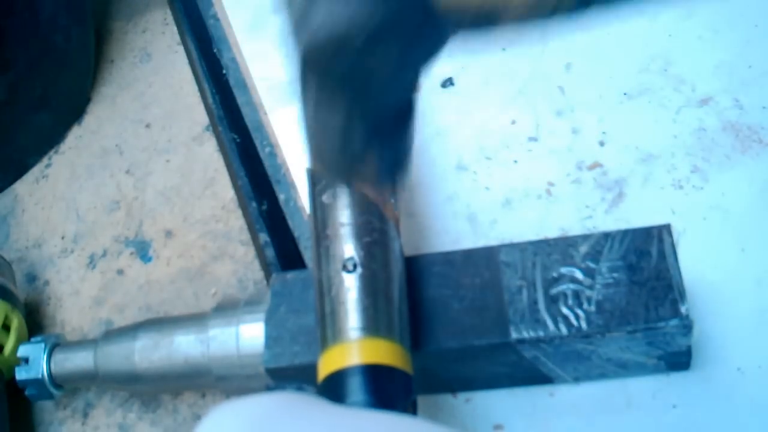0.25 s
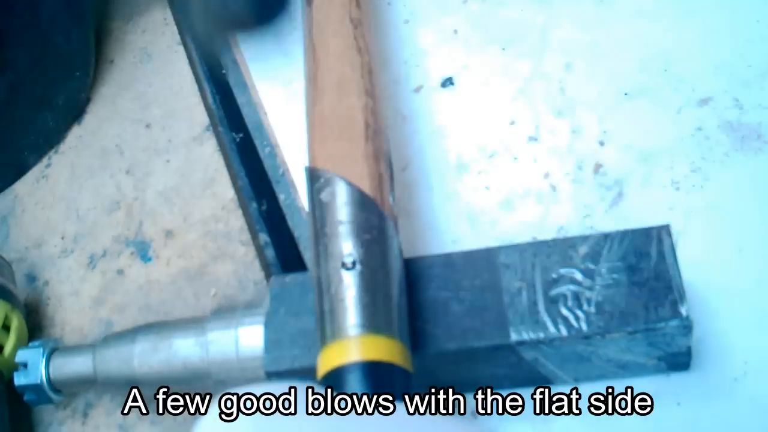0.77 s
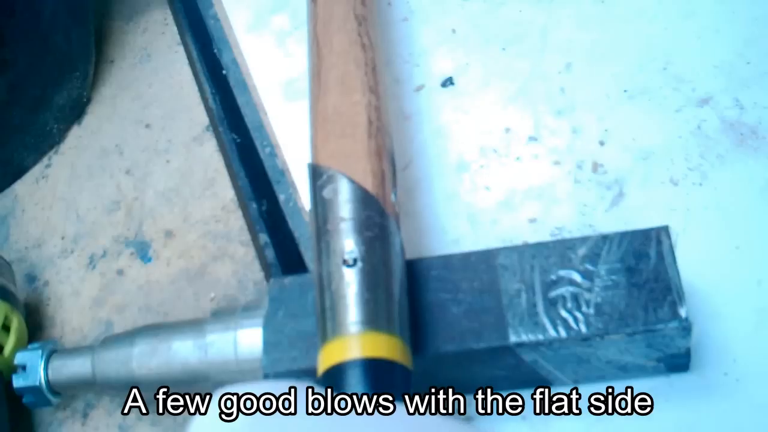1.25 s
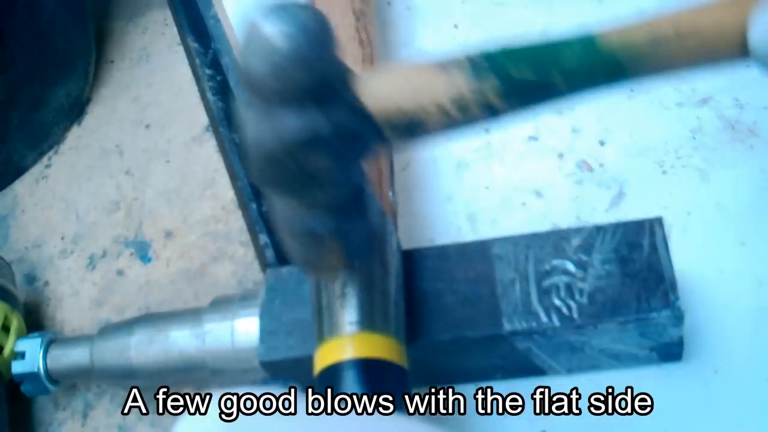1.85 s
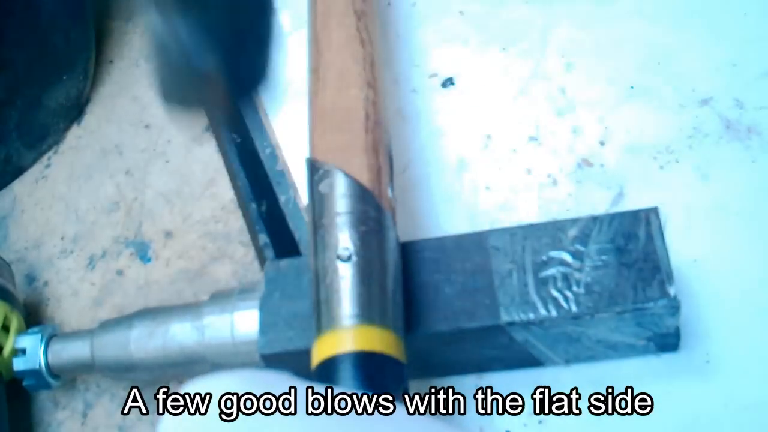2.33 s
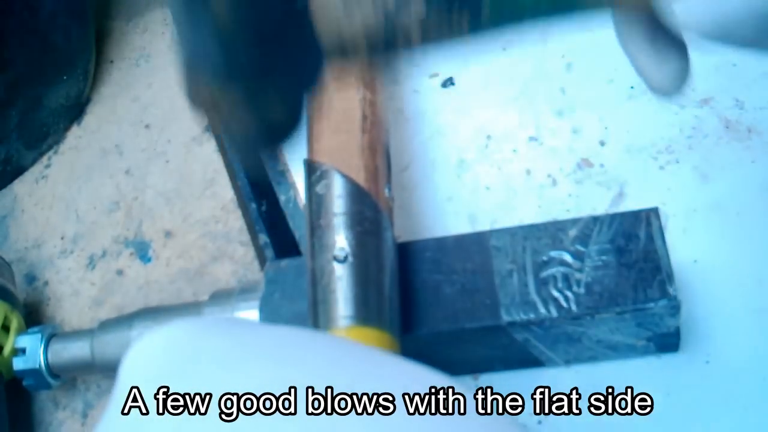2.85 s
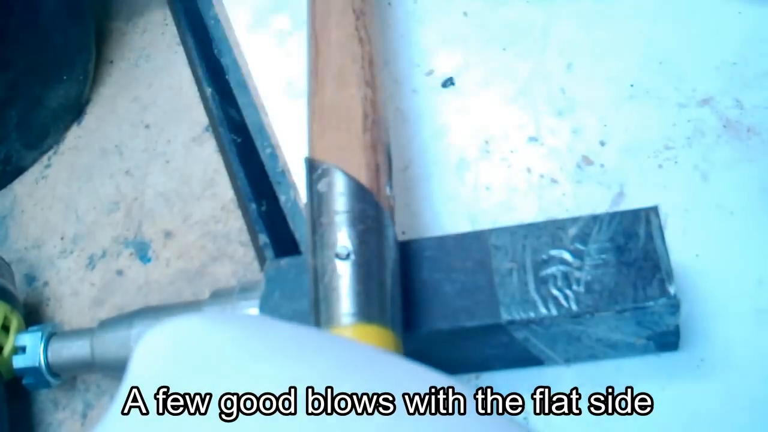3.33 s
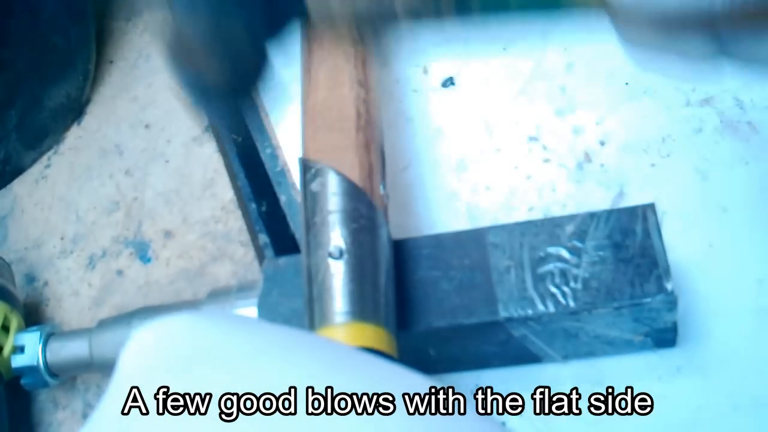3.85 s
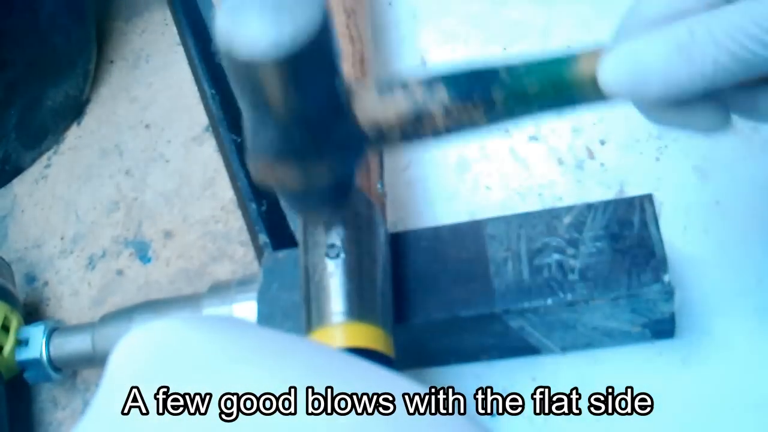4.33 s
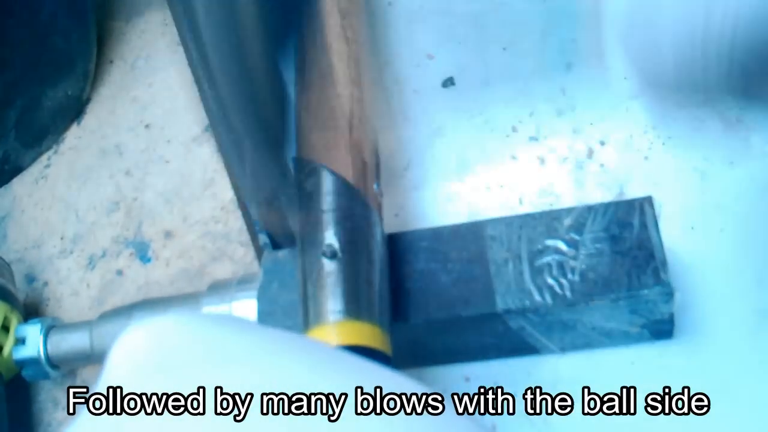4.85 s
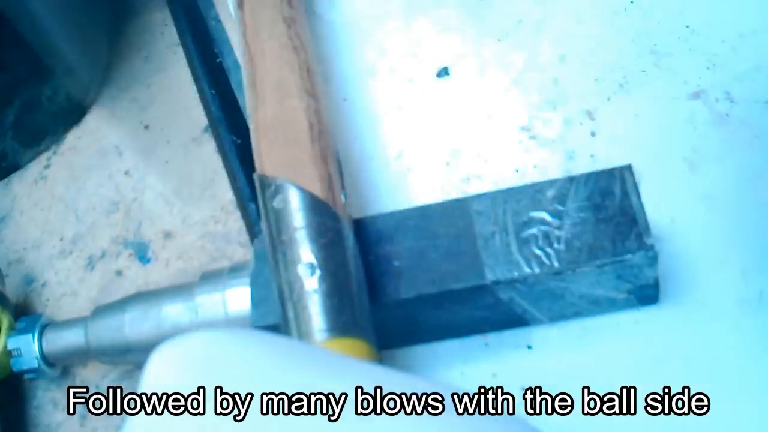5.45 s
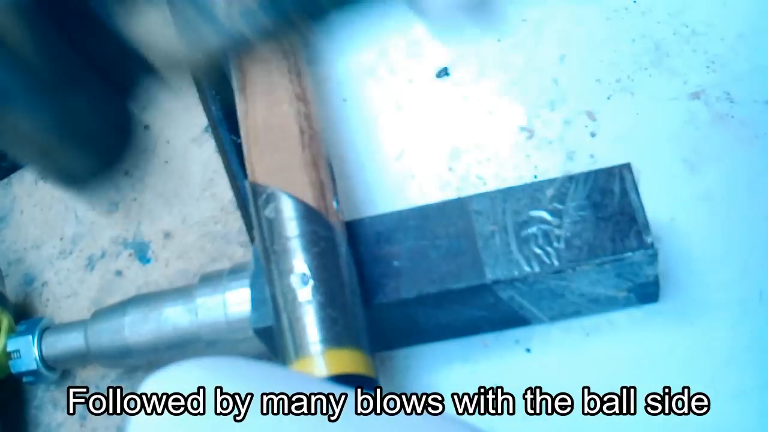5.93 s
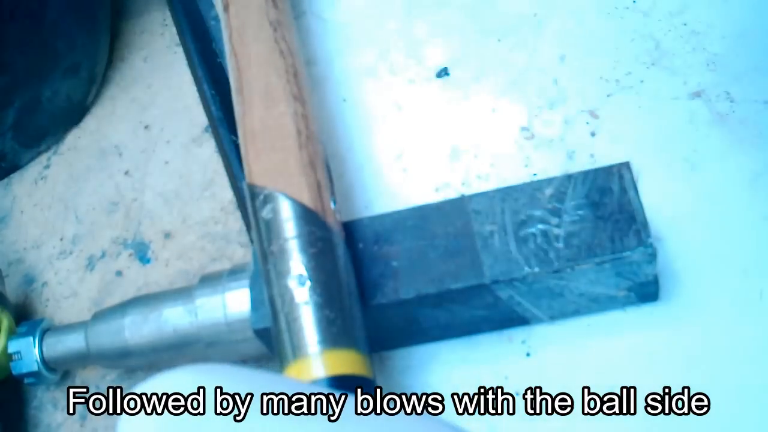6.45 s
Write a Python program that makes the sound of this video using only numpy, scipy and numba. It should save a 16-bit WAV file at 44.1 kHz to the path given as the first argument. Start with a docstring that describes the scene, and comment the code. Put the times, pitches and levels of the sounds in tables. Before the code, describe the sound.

A hard, reverberant workshop, closely miked, with a very quiet hush and a thin high electrical whine. From 0 to 0.8 s the work shifts on the anvil: a light knock, faint rubbing strokes, a small sinking squeak at 0.6 and a tiny creak just before the first blow. At 0.9 s a hammer cracks onto steel, then again at 1.25, 1.6, 2.0 and 2.4, the first drier, the rest with a strong bench thump, high steely ring, noisy clatter and short room tail. From 2.5 to 3.1 the echo fades under soft sliding, with dull little knocks near 2.9 and 3.35. Blows resume at 3.4, quicker, about every 0.28 s, until the hardest at 5.37, followed by a sharp clattering knock at 5.45. Three brighter, less singing blows land at 5.7, 6.05 and 6.35, the last still ringing at the end. Peaks are squashed and slightly clipped.

```python
"""In a hard-walled workshop a hammer peens a steel rivet on a bench anvil: five blows, a pause, eleven quicker ones.
Each blow mixes a noisy crack, fading tones for steel and bench, and fading noise for clatter and room.
Before the first blow and in the pause the work slides (noise); it also knocks, squeaks and creaks.
Soft hush and a thin electrical whine lie underneath.
A limiter turns loud moments down, and the crack that slips past it is clipped."""
import sys
import numpy as np
from scipy import signal
from scipy.fft import rfft, irfft, next_fast_len
from scipy.io import wavfile
from scipy.ndimage import map_coordinates
from numba import njit

SR = 44100
rng = np.random.default_rng(int(sys.argv[2]) if len(sys.argv) > 2 else 0)


def int16_out(signal):
    """Quantize to a 16-bit WAV file."""
    q = np.round(np.clip(np.atleast_2d(signal).T, -1, 1) * 32767)
    wavfile.write(sys.argv[1], SR, q.astype(np.int16))


N = 294588

AGE = np.arange(SR) / SR  # seconds since a sound began; a single sound lasts at most one second


def amp(db):
    """Turn decibels into a plain multiplying factor."""
    return 10 ** (np.asarray(db) / 20)


def unit(x):
    """Scale a sound to an average (rms) level of 1."""
    return x / np.sqrt(np.mean(x ** 2) + 1e-20)


def along(points, hz):
    """Read a curve of (Hz, value) points, joined by straight lines on a log pitch axis."""
    point_hz, values = np.transpose(points)
    return np.interp(np.log(hz + 1), np.log(point_hz + 1), values)


def wobble(rate, t):
    """A smooth random curve over the times t, with rate random points a second."""
    knots = rng.standard_normal(int(t[-1] * rate) + 4)
    return map_coordinates(knots, [t * rate], order=2)


def add(track, s, sound):
    """Mix a sound into the track at s seconds, cutting what runs past the end."""
    start = max(round(s * SR), 0)
    track[start:start + len(sound)] += sound[:N - start]


def noise(spectrum, size):
    """Random hiss, coloured by a curve of (Hz, dB) points and scaled to rms 1."""
    m = next_fast_len(size)
    white = rfft(rng.standard_normal(m))
    colour = amp(along(spectrum, np.fft.rfftfreq(m, 1 / SR)))
    return unit(irfft(white * colour, m)[:size])


def dying(spectrum, t60, bright_db):
    """Noise in which each pitch dies at its own speed; bright_db lifts (or lowers) the treble."""
    hz, t, z = signal.stft(noise(spectrum, SR), SR, nperseg=256)
    treble_db = bright_db * along([(1000, 0), (6000, 0.91)], hz)[:, None]
    decay_db = -60 * t / along(t60, hz)[:, None]
    return signal.istft(z * amp(treble_db + decay_db), SR, nperseg=256)[1][:SR]


def burst(centre_hz, t60, slope_db):
    """Dying noise around one pitch, falling slope_db per octave on both sides."""
    hump = [(centre_hz * 2. ** k, -slope_db * abs(k)) for k in range(-4, 4)]
    return noise(hump, SR) * amp(-60 * AGE / t60)


def swell(direct, seconds):
    """The direct share of a sound comes at once; reflections pile up on it."""
    return 1 - (1 - min(direct, 1)) * np.exp(-AGE / seconds)


def ring(modes, strengths_db, waver, waver_rate):
    """Struck objects sound as dying tones; reflections make the size and phase of each one waver."""
    out = np.zeros(SR)
    coarse = AGE[::63]  # the waver is slow, so few points are enough
    for (hz, db, t60), extra_db in zip(modes, strengths_db):
        steady = np.exp(2j * np.pi * rng.random())
        stray = wobble(waver_rate, coarse) + 1j * wobble(waver_rate, coarse)
        swirl = (steady + waver * stray) / np.sqrt(.5 + waver ** 2)
        size = swirl * amp(db + extra_db - 60 * coarse / t60)
        out += np.real(np.interp(AGE, coarse, size) * np.exp(2j * np.pi * hz * AGE))
    return out


def background():
    """Room hush is coloured noise; a thin electrical whine is a high tone with an unsteady phase."""
    # colour of the hush: (f/Hz, level per Hz/dB)
    hush_colour = [(15, -34), (25, 2), (191, -3.5), (301, 3), (354, -3), (856, -1.5), (1760, -7.5),
                   (3440, -10), (6720, -15.5), (15000, -21)]
    time = np.arange(N) / SR
    whine = np.sin(2 * np.pi * 15735 * time + .8 * wobble(90, time))
    return amp(-59.5) * noise(hush_colour, N) + amp(-67) * whine


def knocks():
    """The work knocks on the anvil: each knock is a short burst of noise around one pitch."""
    # the knocks: (t/s, level/dB, centre f/Hz, time to fall 60 dB/s, fall on both sides/dB per octave)
    knock_list = [(.044, -42, 2500, .11, 16), (2.939, -42, 1800, .1, 12), (3.359, -49, 1400, .06, 12),
                  (5.445, -21, 8000, .04, 10), (5.451, -15, 10000, .05, 10), (5.491, -16, 2600, .28, 8.5)]
    out = np.zeros(N)
    for s, db, hz, t60, slope_db in knock_list:
        add(out, s, amp(db) * burst(hz, t60, slope_db))
    return out


def slides():
    """Glove and work slide on the anvil: rubbing noise that takes hold, holds and lets go."""
    # the slides: (start t/s, length/s, level/dB)
    slide_list = [(0, 0.03, -47), (0.043, 0.041, -48.5), (0.115, 0.049, -51.5), (0.181, 0.1, -59),
                  (0.326, 0.091, -55.5), (0.456, 0.073, -59), (0.571, 0.023, -55), (.795, 0.018, -61),
                  (2.55, 0.11, -53), (2.698, 0.12, -52), (2.823, 0.14, -52.5), (2.983, 0.023, -46.5),
                  (3.039, 0.067, -59.5)]
    # colour of the rubbing: (f/Hz, level per Hz/dB)
    slide_colour = [(500, -41), (1500, -8), (2400, 2.5), (4000, 5.5), (6000, 4), (9000, -1), (15000, -1)]
    attack_s, release_s = 0.0067, 0.017
    out = np.zeros(N)
    for s, length, db in slide_list:
        letting_go = np.exp(-np.maximum(AGE - length, 0) / release_s)
        stroke = swell(0, attack_s) * letting_go
        uneven = amp(db + 2.4 * wobble(66, AGE))
        add(out, s, uneven * stroke * noise(slide_colour, SR))
    return out


def squeak():
    """Steel squeaks on steel: a note sinks to a nearly steady pitch as it swells, then fades."""
    start_hz, end_hz, glide_s = 4600, 3450, .013
    pitch = end_hz + (start_hz - end_hz) * np.exp(-AGE / glide_s)
    slips = 1 + .045 * wobble(900, AGE)  # uneven slips blur the note
    level = amp(-53 - 60 * AGE / .36 + 6.4 * wobble(120, AGE)) * swell(0, .03)
    out = np.zeros(N)
    add(out, .612, level * np.sin(2 * np.pi * np.cumsum(pitch * slips) / SR))
    return out


def creak():
    """Pressed down before the first blow, the work sticks and slips in a row of growing clicks."""
    start_s, length_s, slips_per_s = .786, .04, 210
    first_db, rise_db = -52, 9  # the rise is spread over the whole length
    out = np.zeros(N)
    for age in np.arange(0, length_s, 1 / slips_per_s):
        click_db = first_db + rise_db * age / length_s
        add(out, start_s + age, amp(click_db) * burst(3200, t60=.006, slope_db=13))
    return out


def seat(s):
    """How the work sits on the anvil at time s decides the colour of a blow."""
    # loose, bedded by the first blow, reset in the pause, knocked askew:
    # (from t/s, brightness/dB, bench thump/dB, deep thud/dB, lowest steel ring/dB)
    seat_list = [(0, 0.5, -15.5, 6, -32), (1.1, 1, -2.5, 5, -5.5), (3.1, -2.5, 0, 5, -3.5),
                 (5.6, 4.5, -2.5, 10, -5)]
    return [row[1:] for row in seat_list if row[0] <= s][-1]


def room():
    """The far room answers with noise that builds up quickly and dies away, treble first."""
    # colour of the room: (f/Hz, level per Hz/dB)
    room_colour = [(30, -17), (110, -1.5), (170, -2.5), (400, -0.5), (800, 5.5), (1500, 0), (3000, -5),
                   (7000, -17), (15000, -41)]
    # how long the room sounds: (f/Hz, time to fall 60 dB/s)
    room_t60 = [(100, 1.9), (300, 1.57), (800, 0.85), (2000, 0.71), (10000, 0.43)]
    return amp(-23.0) * dying(room_colour, room_t60, 0) * swell(0, 0.0085)


def standing_wave():
    """Sound caught between the walls hums on at one low pitch after a blow."""
    # the hum: (f/Hz, level/dB, time to fall 60 dB/s)
    hum_mode = [(187, -37, 1.3)]
    return ring(hum_mode, [0], waver=.5, waver_rate=20) * swell(0, .03)


def clatter(bright_db):
    """Bench and near walls clatter: lumpy noise in which each pitch dies at its own speed."""
    # colour of the clatter: (f/Hz, level per Hz/dB)
    clatter_colour = [(25, -24), (100, -5.5), (200, 1), (350, 2), (560, -1), (780, 2.5), (950, 0),
                      (1500, 2.5), (2300, -1), (3600, -2.5), (6500, -9), (10000, -13), (15500, -19)]
    # how long it sounds: (f/Hz, time to fall 60 dB/s)
    clatter_t60 = [(80, 0.28), (300, 0.48), (1000, 0.39), (3000, 0.34), (7000, 0.28), (14000, 0.24)]
    # single strong reflections and rattles stand out of the clatter
    lumps = amp(2.2 * wobble(260, AGE))
    return amp(-3.5) * dying(clatter_colour, clatter_t60, bright_db) * swell(0.46, 0.047) * lumps


def bench(thump_db, thud_db):
    """The struck bench sounds as dying tones of its wooden top and its deeper frame."""
    # the bench top, lowest tone first: (f/Hz, level/dB, time to fall 60 dB/s)
    top_modes = [(152.9, -4.5, 0.14), (175.6, -31.5, 0.72), (264.3, -27.5, 0.47), (330.4, -25.5, 0.66),
                 (446, -19.5, 0.29), (784, -29.5, 0.71), (1385, -24.5, 0.54), (1513, -30, 0.33)]
    # the bench frame: (f/Hz, level/dB, time to fall 60 dB/s)
    frame_modes = [(35.8, -38, .2), (61.3, -29.5, 0.25), (99.4, -37, 0.35)]
    # the lowest tone of the top takes the weight of the blow
    thump = ring(top_modes[:1], [thump_db], waver=0.25, waver_rate=100)
    top = ring(top_modes[1:], rng.normal(0, 2, len(top_modes) - 1), waver=1.1, waver_rate=45)
    frame = ring(frame_modes, [thud_db] * len(frame_modes), waver=1.0, waver_rate=40)
    return (thump + top + frame) * swell(0, 0.0067)


def steel(steel_db, low_ring_db, sing_db):
    """The struck steel rings in four main tones and many weaker ones."""
    # the main rings, the third being the long singing one: (f/Hz, level/dB, time to fall 60 dB/s)
    main_modes = [(7371, -13, .25), (9561, -18.5, .21), (10632, -13.5, .28), (13706, -14.5, .17)]
    # the weaker tones: (f/Hz, level/dB, time to fall 60 dB/s)
    weak_modes = [(3252, -31, .28), (3758, -29, .3), (5399, -29, .24), (5615, -29, .24), (5822, -25, .23),
                  (7020, -30, .24), (8025, -26, .23), (9598, -24, .21), (12094, -24, .2), (13335, -24, .17),
                  (13770, -20, .16)]
    # no two blows land on quite the same spot, so the strengths scatter by 1.2 dB
    ring_db = rng.normal([steel_db + low_ring_db, steel_db, sing_db, steel_db], 1.2)
    main_rings = ring(main_modes, ring_db, waver=.35, waver_rate=50)
    # a blow that wakes the main rings wakes the weaker tones too
    weak_db = rng.normal(.5 * np.mean(ring_db), 2, len(weak_modes))
    overtones = ring(weak_modes, weak_db, waver=.7, waver_rate=45)
    # the rings arrive mostly by way of the walls, so they swell before they die
    return (main_rings + overtones) * swell(.25, .035) ** 2


def contact(clank_hz):
    """Hammer meets steel: a dull push turns into a bright, noisy clank within a millisecond."""
    push = amp(0.5) * np.sin(2 * np.pi * 600 * AGE) * amp(-60 * AGE / 0.0064)
    clank = amp(6.0) * np.sin(2 * np.pi * clank_hz * AGE) * amp(-60 * AGE / 0.0089)
    hiss = amp(6.0) * burst(3260, t60=0.0098, slope_db=6.0)
    return push + (clank + hiss) * swell(0, 0.00051)


def hammer():
    """Each blow joins the contact, ringing steel, bench and the answer of the workshop."""
    # the blows: (t/s, force/dB, clank f/Hz, steel ring/dB, its singing tone/dB)
    blow_list = [(0.8825, -5, 1920, 4, -29), (1.2558, -2.5, 3010, -4, 4.5), (1.6193, 0, 3170, -4, -6.5),
                 (2.0199, 0.5, 1910, 0.5, 5), (2.3841, 0, 1880, -2, -3.5), (3.4002, -5, 1870, 5.5, 5.5),
                 (3.6691, -3, 7900, 2, -4.5), (3.9622, -4, 1810, 0, -7.5), (4.241, -0.5, 1910, 0.5, -5.5),
                 (4.518, -3.5, 3100, 6, 3.5), (4.8002, -3, 3810, 7, -7), (5.0841, -3.5, 1820, 2, 2.5),
                 (5.3685, 3.5, 1850, 7, -15), (5.7279, -2.5, 2370, -12, -22), (6.0442, 0, 2910, 0, -16),
                 (6.3562, -1, 2730, 2, -11)]
    # a harder blow is brighter and shakes the frame more: dB per dB of force
    bright_per_db, thud_per_db = 0.22, .7
    out = np.zeros(N)
    for s, force_db, clank_hz, steel_db, sing_db in blow_list:
        bright_db, thump_db, thud_db, low_ring_db = seat(s)
        bright_db += bright_per_db * force_db
        thud_db += thud_per_db * force_db
        struck = contact(clank_hz) + steel(steel_db, low_ring_db, sing_db) + bench(thump_db, thud_db)
        answer = clatter(bright_db) + room() + standing_wave()
        add(out, s, amp(force_db) * (struck + answer))
    return out


def scene():
    """Blows and handling of the work over the quiet of the workshop."""
    handling = knocks() + slides() + squeak() + creak()
    return (background() + handling + hammer())[None]


@njit
def follow(size, rise, fall):
    """A level detector that rises quickly and falls slowly."""
    out, level = np.zeros(len(size)), 0.
    for i in range(len(size)):
        level += (size[i] - level) * (rise if size[i] > level else fall)
        out[i] = level
    return out


def limiter(x, threshold_db, attack, release):
    """Turn the sound down while its level is over the threshold; attack and release in seconds."""
    rise = 1 - np.exp(-1 / (attack * SR))
    fall = 1 - np.exp(-1 / (release * SR))
    level = follow(np.abs(x), rise, fall)
    return x / np.maximum(1, level / amp(threshold_db))


def record(dry):
    """Limit the sound, round off the peaks that slip past, and remove the highest treble."""
    held = limiter(dry[0], threshold_db=-14.5, attack=0.0013, release=0.016)
    clipped = held / (1 + np.abs(held / amp(-12.6)) ** 6) ** (1 / 6)
    top_hz = 15900
    m = next_fast_len(N + SR)
    kept = np.fft.rfftfreq(m, 1 / SR) < top_hz
    return irfft(rfft(clipped, m) * kept, m)[None, :N]


dry = scene()
out = record(dry)
int16_out(out)
```